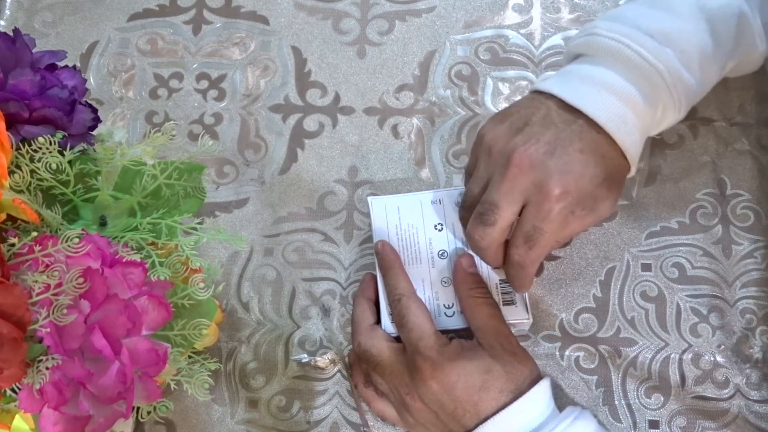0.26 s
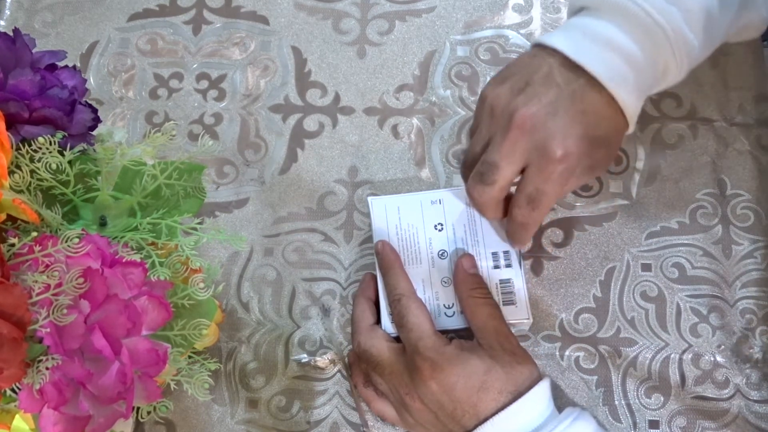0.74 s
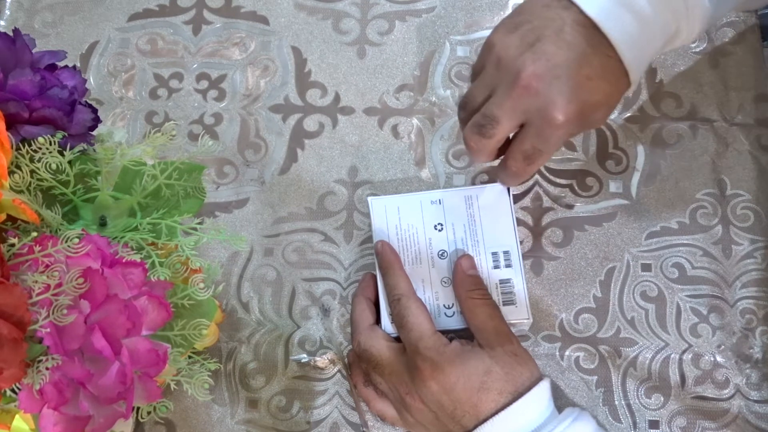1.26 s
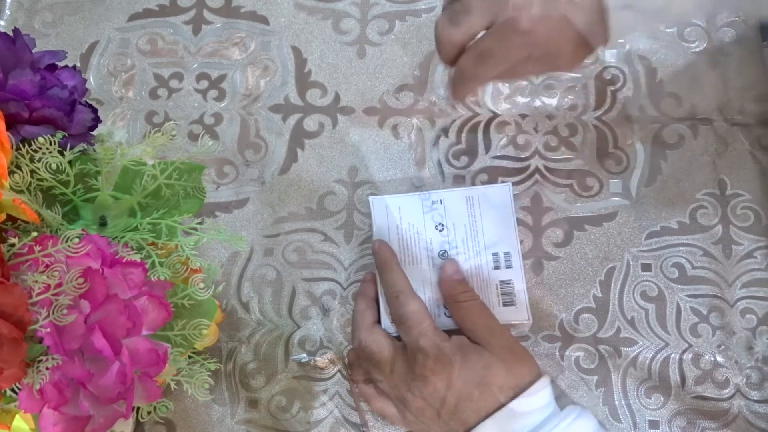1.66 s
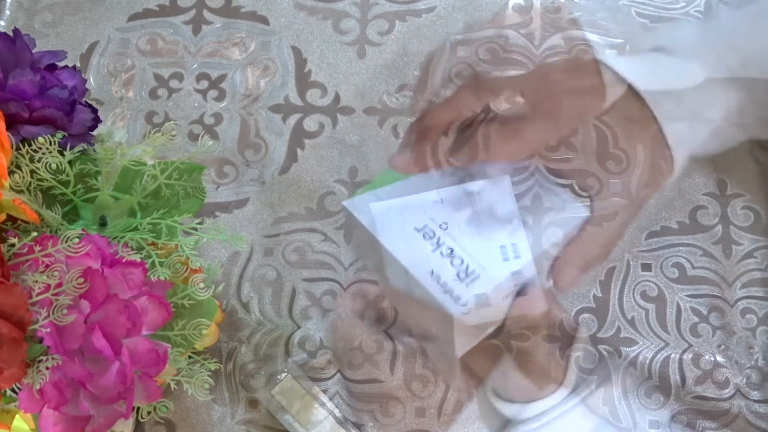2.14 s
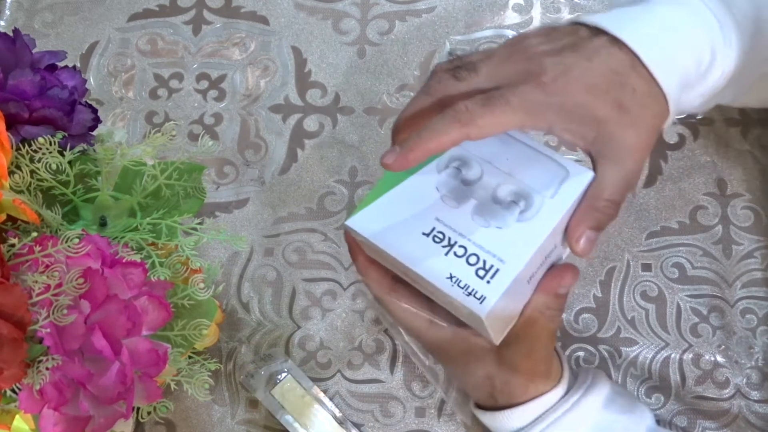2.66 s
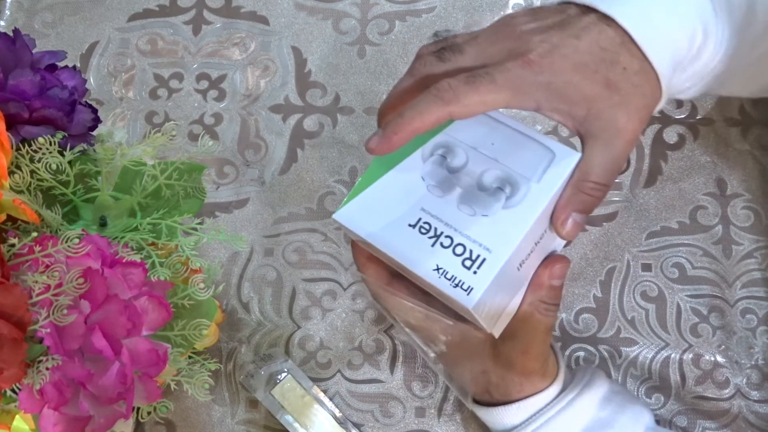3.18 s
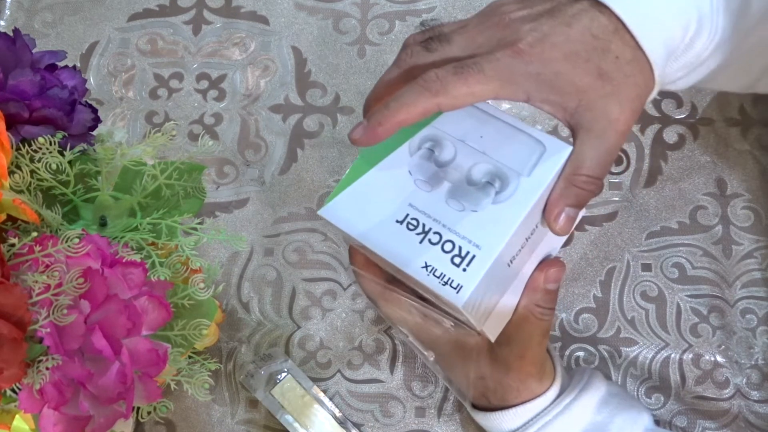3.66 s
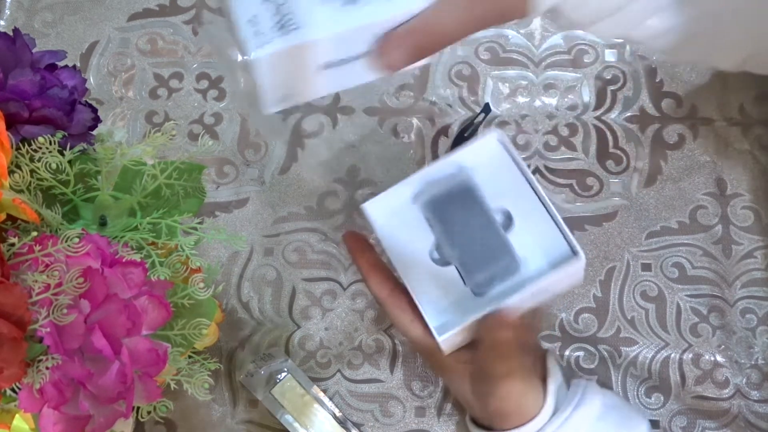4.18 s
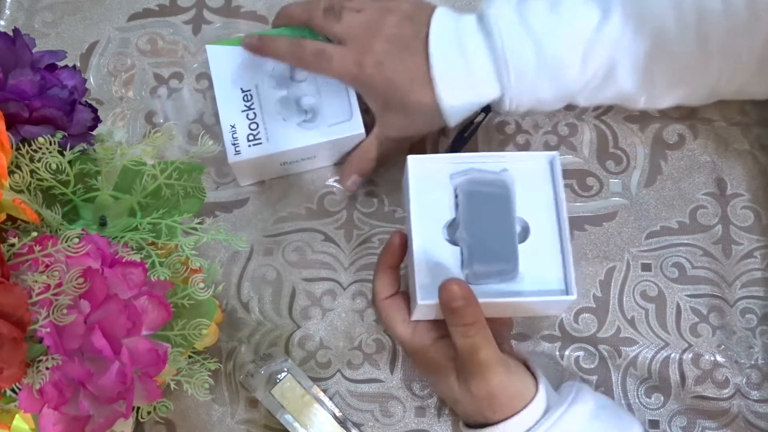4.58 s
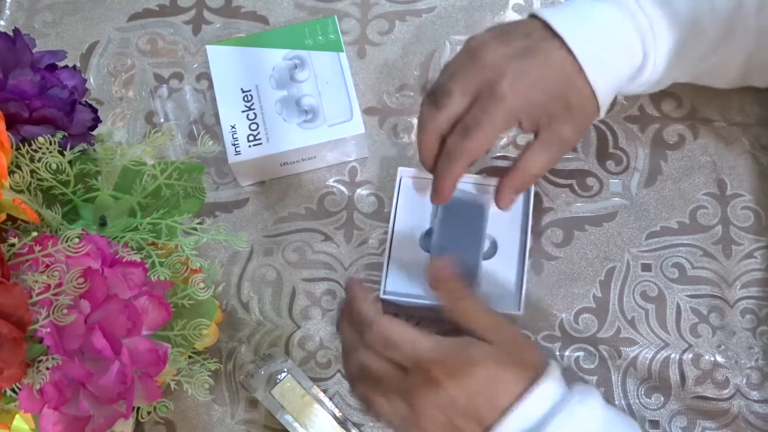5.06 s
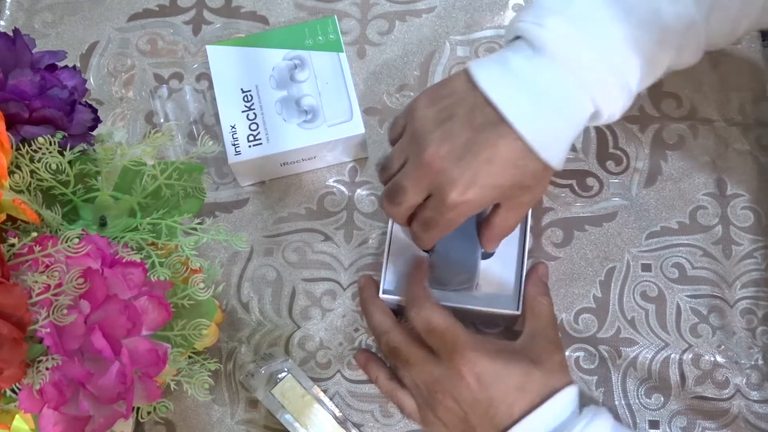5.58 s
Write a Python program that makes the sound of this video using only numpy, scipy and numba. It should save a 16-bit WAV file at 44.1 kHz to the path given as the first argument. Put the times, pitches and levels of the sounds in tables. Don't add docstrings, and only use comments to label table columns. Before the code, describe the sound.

Sealing film is picked and peeled from a small card box, its lid scrapes off and drops with a clatter, then the tray is knocked and handled.

```python
import sys
import numpy as np
from scipy import signal
from scipy.fft import rfft, irfft
from scipy.io import wavfile
from scipy.ndimage import uniform_filter1d
from numba import njit

SR = 44100
rng = np.random.default_rng(int(sys.argv[2]) if len(sys.argv) > 2 else 0)


def log_audio(samples):
    frames = np.atleast_2d(samples).T
    limited = np.clip(frames, -1, 1)
    pcm = np.round(limited * 32767).astype(np.int16)
    wavfile.write(sys.argv[1], SR, pcm)


def invert_db(level):
    return 10 ** (np.asarray(level, dtype=float) / 20)


N = 256662

# centre in Hz, width in Hz, level in dB.
MOTOR_MODES = [(365, 40, -12), (470, 50, 0), (637, 20, -7), (947, 16, -1), (1250, 50, -8), (1420, 50, -2.5),
               (1690, 60, -11), (2250, 60, -3), (2590, 67, -15), (2940, 62, -19)]
MOTOR_HZ, MOTOR_DB = 25.02, -63
# frequency in Hz, density in dB per Hz.
AIR_SPECTRUM = [(20, -37), (45, -9), (90, -19.5), (250, -18.5), (600, -13.5), (1500, -17), (1950, -22),
                (2800, -25.5), (4200, -34), (7000, -37.5), (10600, -32.5)]
AIR_DB = -62.5

# centre in Hz, width in Hz, level in dB.
CARD_MODES = [(114, 17, -8.5), (226, 130, -46), (298, 310, 3.5), (382, 58, 5.5), (528, 87, 3),
              (669, 240, 1), (843, 88, 0), (866, 180, -0.5), (1240, 300, 4.5), (1495, 87, 0.5),
              (1815, 94, 7), (2180, 260, 14.5)]
# centre in Hz, width in Hz, level in dB.
EDGE_MODES = [(2640, 1100, 3), (3520, 270, -0.5), (3600, 510, 2), (4790, 2200, 3.5)]
# centre in Hz, width in Hz, level in dB.
FILM_MODES = [(5010, 2300, -5.5), (7490, 1870, 3.5), (8800, 2060, 2.5), (10480, 1270, -4.5)]
# thud in dB, edge in dB, snap in dB.
ECHO_DB = (-10.5, -29, -15)
ECHO_S = 0.01
# thud in dB, edge in dB, snap in dB.
SEND_DB = (3, 2.5, -1)

# start in seconds, snap in dB, jolt of the card edge in dB.
SNAPS = [(0.586, -41, -28), (1.596, -45, -55), (1.6209, -28, -37), (1.637, -30.5, -41), (1.7754, -31, -44),
         (1.7975, -51, -39), (1.81, -23.5, -35), (1.8877, -51, -31), (2.012, -38, -55), (2.027, -29.5, -41),
         (2.0477, -27.5, -34.5), (2.0882, -30, -36), (2.1075, -43, -36), (2.1382, -56, -32),
         (2.2165, -34, -50), (2.2404, -45, -44), (2.3014, -44, -48), (3.7694, -37, -43), (3.857, -51, -67),
         (4.0184, -64, -57), (4.2675, -42.5, -48), (4.2895, -46, -57), (4.293, -37.5, -47),
         (5.3694, -55, -35), (5.5712, -54, -32), (5.5997, -35, -34), (5.6077, -37, -33), (5.7815, -68, -40)]
SNAP_THUD_DB, SNAP_SEND_DB, SNAP_OCTAVE = -16.5, -6.5, 2.313
FAINT_DB, FAINT_SEND = -31.5, 0.37
# start in seconds, snap in dB, jolt of the card edge in dB, thud in dB,
# thud pitch in octaves over 200 Hz.
TUGS = [
    (0.7986, -31.5, -21, -35.5, 2.2),
    (1.6117, -24.5, -31, -36, 2.06),
    (1.7486, -24.5, -29, -35.5, 2.03),
    (1.7657, -26.5, -42, -43, 1.8),
    (1.8233, -37, -25.5, -43.5, 1.54),
    (1.8419, -34.5, -26.5, -39, 2.36),
    (2.1814, -25, -18.5, -31, 2.69),
    (2.2581, -27.5, -25, -47, 2.08),
]
TUG_SEND_DB = -7.5
# start in seconds, thud in dB, edge click over the thud in dB,
# thud pitch in octaves over 200 Hz, room send in dB.
KNOCKS = [(1.4775, -40, -7.5, 0.73, -7), (2.7601, -55, -1, .83, 3), (2.9205, -51, 10, 1.03, 5.5),
          (3.7282, -46, 15, 2.7, 3), (3.7479, -29.5, 7, 1.7, -12), (3.7574, -41, -2.5, 0.84, -11.5),
          (4.0944, -64, 15, 3.2, 1.5), (4.8465, -9, 4.5, 2.2, -6.5), (5.0178, -9.5, 3.5, 2.13, -8),
          (5.0395, -7, 8.5, 1.56, -12.5), (5.0762, -23.5, 18, 0.76, -13.5)]
# start in seconds, thud in dB, edge click over the thud in dB,
# thud pitch in octaves over 200 Hz.
LANDING = [
    (4.4718, -35, 0, 1.8),
    (4.476, -13.5, 0, 1.73),
    (4.4928, -9.5, -21, 2.1),
    (4.5045, -11.5, -0.5, 1.8),
    (4.526, -19, -22, 1.3),
    (4.5364, -15.5, -21, 2.05),
    (4.5476, -14.5, -28, 2.08),
    (4.5601, -19.5, -22, 1.95),
]
KNOCK_SNAP_DB, LANDING_SEND_DB = -26, -6

# peak in seconds, length in seconds, level in dB.
PEEL = [(.6, 0.026, -55), (1.1, 0.18, -80), (1.47, 0.095, -60), (1.79, 0.21, -39), (1.99, 0.3, -39),
        (2.1, 0.13, -42.5), (2.24, 0.12, -39.5), (2.4, 0.12, -57.5), (2.78, 0.21, -60.5),
        (3.38, 0.079, -61), (3.9, 0.15, -60), (4.1, 0.51, -64.5), (4.38, 0.29, -48), (4.53, 0.054, -49),
        (5.48, 0.13, -63.5), (5.64, 0.066, -44.5)]
# peak in seconds, length in seconds, level in dB.
FINGERS = [(.66, 0.3, -64), (.98, 0.37, -56), (1.17, 0.24, -61), (1.46, 0.56, -60.5), (1.7, 0.19, -59),
           (2.2, 0.17, -54), (2.92, 0.19, -46.5), (3.14, 0.21, -46.5), (3.36, 0.25, -45.5),
           (3.55, 0.39, -54.5), (3.74, 0.17, -47.5), (4.05, 0.78, -66.5), (4.53, .1, -44.5),
           (5.29, 0.29, -45.5), (5.46, 0.22, -50.5), (5.62, 0.38, -51)]
# peak in seconds, length in seconds, level in dB.
BUMPS = [
    (1.03, 0.13, -79),
    (1.88, .14, -54),
    (3.76, 0.091, -49.5),
    (4.05, 0.35, -73),
    (5.17, .16, -62),
    (5.62, 0.37, -62),
]
RISE, FALL = 0.26, 0.36
# time in seconds, pitch in Hz, level in dB.
LID = [
    (2.66, 225, -77),
    (2.76, 223, -55),
    (2.9, 300, -59),
    (3.05, 310, -61.5),
    (3.15, 272, -53.5),
    (3.35, 326, -54.5),
    (3.55, 400, -54),
    (3.75, 378, -52.5),
    (3.95, 378, -97),
]
# centre in Hz, width in Hz, level in dB.
SLEEVE_MODES = [(510, 1200, -2.5), (938, 282, 7.5), (1071, 400, 3.5), (1420, 126, -2)]
# centre in Hz, width in Hz, level in dB.
SKIN_MODES = [(1875, 204, 0.5), (2310, 520, -1), (3100, 270, 1.5), (3860, 3600, 3.5)]
FINGER_DRAG_DB, FINGER_FILM_DB, PEEL_SKIN_DB = -7, -1, -22
LID_DRAG_DB, LID_SKIN_DB, LID_RUMBLE_DB, LID_SEAM_DB = 3, -5, -20.5, -6

# centre in Hz, width in Hz, peak in dB, room send in dB.
POP = (585, 298, -28.5, -0.5)
POP_S = 0.7995
# frequency in Hz, 60 dB decay in seconds, level in dB.
TABLE_MODES = [(222.8, 0.16, -7.5), (325.2, 0.81, -15), (561.3, 0.4, -17), (868, 0.21, -14.5)]
# band centre in Hz, 60 dB decay in seconds, level in dB.
ROOM = [(111, 0.87, 0), (300, 0.6, 2.5), (700, 0.58, 1.5), (1403, 0.5, 4.5), (3150, 0.5, -2),
        (6200, 0.47, -0.5), (10140, 0.3, -2.5)]
ROOM_SIDE_DB = (-15, -19.5, -16, -13, -9, -10, -6)
RUB_SEND_DB = -4.5
TOP_HZ = 10950


@njit
def svf(x, hz, width):
    y, b, l = np.empty(len(x)), 0., 0.
    for i in range(len(x)):
        g, k = np.tan(np.pi * hz[i] / SR), width / hz[i]
        v = (b + g * (x[i] - l)) / (1 + g * (g + k))
        b, l, y[i] = 2 * v - b, l + 2 * g * v, k * v
    return y


def band(x, hz, width):
    centre_hz = np.clip(hz * np.ones(len(x)), 20, .45 * SR)
    return svf(x + 1e-18, centre_hz, max(float(width), 5.))


def band_twice(x, hz, width):
    return band(band(x, hz, width), hz, width)


def unit(x):
    return x / np.sqrt(np.mean(x ** 2))


def mode_answers(x, modes):
    return np.array([(-1) ** k * invert_db(db) * band(x, hz, width) / np.sqrt(width)
                     for k, (hz, width, db) in enumerate(modes)])


def ring(x, modes):
    return mode_answers(x, modes).sum(0)


def walk(rate_hz):
    hold = int(SR / rate_hz)
    steps = np.repeat(rng.standard_normal(N // hold + 1), hold)
    return 1.3 * uniform_filter1d(uniform_filter1d(steps, hold), hold)[:N]


def grains(per_s, spread_db, smooth):
    size = invert_db(spread_db * np.minimum(rng.exponential(size=N), 3))
    size = size * np.sign(rng.standard_normal(N))
    slips = unit((rng.random(N) < per_s / SR) * size)
    return unit(slips + smooth * rng.standard_normal(N))


def strokes(table):
    t = np.arange(N) / SR
    pressure = np.zeros(N)
    for s, length_s, db in table:
        spread_s = length_s * np.where(t < s, RISE, FALL)
        pressure += invert_db(db) * np.exp(-((t - s) / spread_s) ** 2)
    return pressure


def motor():
    turn = MOTOR_HZ * (np.arange(N) / SR - .031)
    gate = np.exp(-(turn % 1) / .14) + .5 * np.exp(-((turn + .5) % 1) / .1) + .15
    knock = np.diff(np.floor(turn), prepend=0) * invert_db(1.5 * walk(25))
    throb = unit(ring(gate * rng.standard_normal(N), MOTOR_MODES[:2]))
    throb = throb + 1.1 * unit(band_twice(knock, 470, 90))
    hum = ring((gate + 0.82) * rng.standard_normal(N), MOTOR_MODES[2:])
    hum = sum(band(hum, hz, 2 * width) for hz, width, _ in MOTOR_MODES[2:])
    return invert_db(MOTOR_DB) * (unit(throb) + invert_db(-5.0) * unit(hum)) * invert_db([[-1.0], [1.0]])


def air():
    hz = np.fft.rfftfreq(N, 1 / SR) + 1
    point_hz, point_db = np.transpose(AIR_SPECTRUM)
    colour = invert_db(np.interp(np.log(hz), np.log(point_hz), point_db))
    apart = np.clip(hz / 1200, .25, .9)
    noise = rfft(rng.standard_normal((2, N)))
    mid, side = irfft(noise * colour * [np.ones(len(hz)), apart], N)
    return invert_db(AIR_DB) * unit(mid + side * np.array([[1], [-1]]))


def blows():
    rows = []
    for s, snap, jolt in SNAPS:
        send = SNAP_SEND_DB + FAINT_SEND * max(FAINT_DB - max(snap, jolt), 0)
        rows.append((s, jolt + SNAP_THUD_DB, jolt, snap, send, SNAP_OCTAVE))
    for s, snap, jolt, thud, pitch in TUGS:
        rows.append((s, thud, jolt, snap, TUG_SEND_DB, pitch))
    knocks = list(KNOCKS) + [(*row, LANDING_SEND_DB) for row in LANDING]
    for s, thud, click, pitch, send in knocks:
        rows.append((s, thud, thud + click, thud + click + KNOCK_SNAP_DB, send, pitch))
    return rows


def scattered(power):
    fold = irfft(.5 * np.log(power + 1e-24))
    half = len(fold) // 2
    fold[1:half] *= 2
    fold[half + 1:] = 0
    return irfft(np.exp(rfft(fold)))


def hits():
    direct, send = np.zeros(N + SR), np.zeros(N + SR)
    push = (np.arange(SR // 10) == 0) * 1.
    bodies = [mode_answers(push, modes) for modes in (CARD_MODES, EDGE_MODES, FILM_MODES)]
    powers = [np.abs(rfft(body)) ** 2 for body in bodies]
    octave = np.log2(np.array(CARD_MODES)[:, 0] / 200)
    slip_n = np.arange(SR // 300)
    for s, thud_db, edge_db, snap_db, send_db, pitch in blows():
        slips = rng.standard_normal(len(slip_n)) ** 3 * np.exp(-slip_n / SR / .0005)
        slips[0] = 3.2
        tilt_db = (np.maximum(-12 * (octave - pitch) ** 2, -22), 0, 0)
        start, echo, power = int(s * SR), int((s + ECHO_S) * SR), 0
        for k, peak_db in enumerate((thud_db + 1.5, edge_db - 3, snap_db + 9)):
            weight = invert_db(2.0 * rng.standard_normal(len(bodies[k])) + tilt_db[k])
            clean = weight @ bodies[k]
            tick = signal.fftconvolve(clean, slips)[:len(clean)]
            tick *= invert_db(peak_db) / np.abs(tick).max()
            direct[start:start + len(tick)] += tick
            direct[echo:echo + len(tick)] += tick * invert_db(ECHO_DB[k])
            gain = invert_db(2 * SEND_DB[k]) * np.sum(tick ** 2) / np.sum(clean ** 2)
            power = power + weight ** 2 @ powers[k] * gain
        send[start:start + len(tick)] += invert_db(send_db) * scattered(power)
    return direct[:N], send[:N]


def lid_cavity(drag, hz, slide, fingers):
    cavity = slide * unit(band(band(drag, hz, 177), hz, 200))
    groan = slide * invert_db(-5.0) * unit(band(band(drag, 239, 55), 198, 96))
    seam = (slide + fingers * (slide > 0)) * invert_db(LID_SEAM_DB)
    return cavity + groan + seam * unit(ring(drag, SKIN_MODES[::2])) / 2


def rubbing():
    t = np.arange(N) / SR
    peel, fingers, bumps = strokes(PEEL), strokes(FINGERS), strokes(BUMPS)
    lid_s, lid_hz, lid_db = np.transpose(LID)
    slide = invert_db(np.interp(t, lid_s, lid_db, -200, -200))
    drag = grains(900, 4.15, 0.72)
    total = lid_cavity(drag, np.interp(t, lid_s, lid_hz), slide, fingers)
    sleeve = ring(drag, SLEEVE_MODES)
    skin = ring(grains(1500, 3.5, 1.5), SKIN_MODES)
    film = ring(grains(400, 3.0, 1.5), FILM_MODES)
    rumble = band(band(grains(230, 2.2, 0.2), 90, 170), 107, 230)
    layers = (
        (invert_db(FINGER_DRAG_DB) * fingers + invert_db(LID_DRAG_DB) * slide, sleeve),
        (fingers + invert_db(PEEL_SKIN_DB) * peel + invert_db(LID_SKIN_DB) * slide, skin),
        (peel + invert_db(FINGER_FILM_DB) * fingers, film),
        (bumps + invert_db(LID_RUMBLE_DB) * slide, rumble))
    for pressure, sound in layers:
        total = total + pressure * invert_db(1.2 * walk(40) - 6) * unit(sound)
    return invert_db(walk(40)) * total


def pop():
    hz, width, db, _ = POP
    push = (np.arange(N) == int(POP_S * SR)) * 1.
    boom = band_twice(push, hz, width)
    return invert_db(db) * boom / np.abs(boom).max()


def table_top(x):
    t = np.arange(SR) / SR
    rings = sum(invert_db(db - 60 * t / t60) * np.sin(2 * np.pi * hz * t) for hz, t60, db in TABLE_MODES)
    return signal.fftconvolve(x, rings / np.sqrt(SR / 20))[:N]


def room(x):
    t = np.arange(SR) / SR
    tail = 0
    for (hz, t60, db), side_db in zip(ROOM, ROOM_SIDE_DB):
        mid, side = (unit(band_twice(rng.standard_normal(SR), hz, hz)) for _ in range(2))
        fade = invert_db(db - 60 * t / t60) * np.sqrt(hz)
        fade = fade * (1 + invert_db(-5.5 + 28 * t / t60))
        tail = tail + fade * (mid + invert_db(side_db) * side * np.array([[1], [-1]]))
    build = 1 - np.exp(-np.maximum(t - .002, 0) / 0.00086)
    tail = unit(tail * build) / np.sqrt(SR)
    return signal.fftconvolve(x[None], tail, axes=1)[:, :N]


def scene():
    background = motor() + air()
    direct, send = hits()
    rub, boom = rubbing(), pop()
    walls = room(send + invert_db(RUB_SEND_DB) * rub + invert_db(POP[3]) * boom)
    return direct + rub + boom + table_top(send) + walls + background


def band_limit(x):
    return signal.sosfilt(signal.butter(12, 12300, fs=SR, output="sos"), x)


def record(dry):
    bass_cut = signal.butter(1, 120, "high", fs=SR, output="sos")
    top_cut = signal.cheby1(11, .5, TOP_HZ, fs=SR, output="sos")
    mix = signal.sosfilt(top_cut, signal.sosfilt(bass_cut, dry))
    return band_limit(mix)


dry = scene()
out = record(dry)
log_audio(out)
```